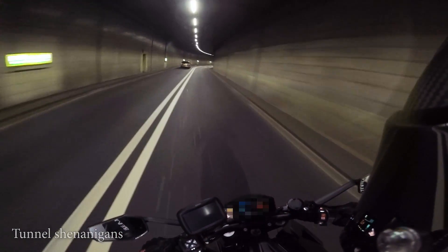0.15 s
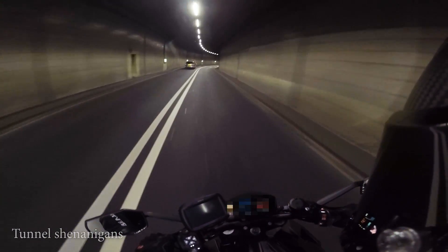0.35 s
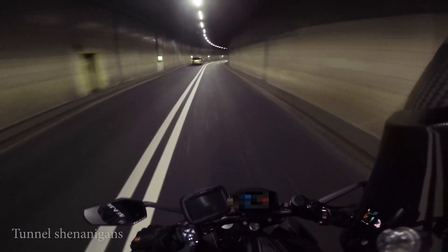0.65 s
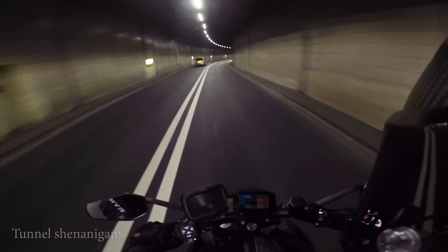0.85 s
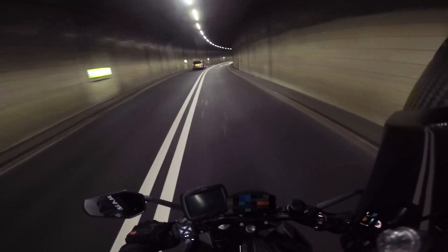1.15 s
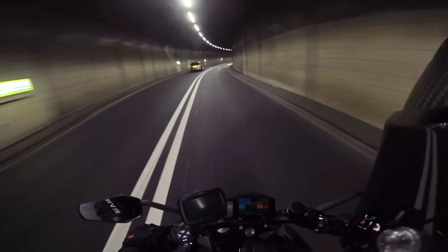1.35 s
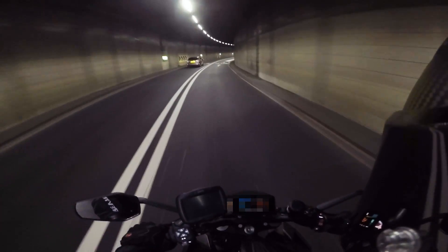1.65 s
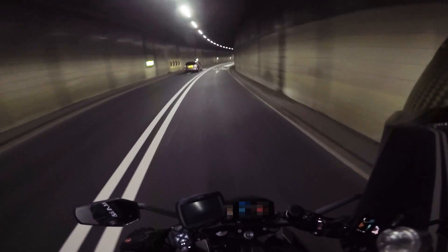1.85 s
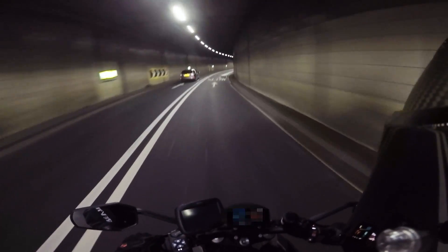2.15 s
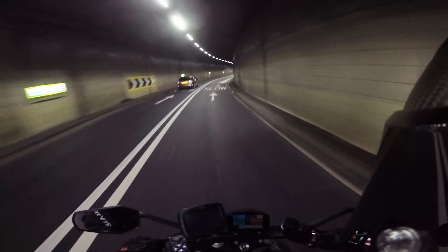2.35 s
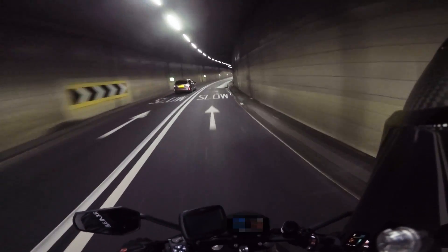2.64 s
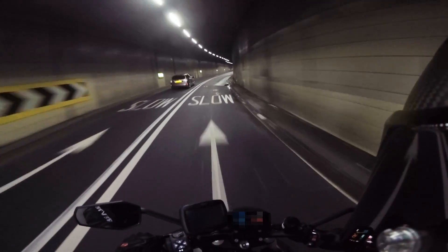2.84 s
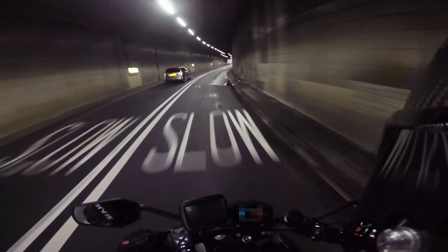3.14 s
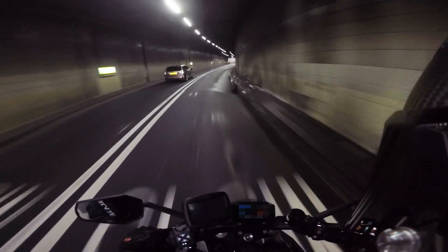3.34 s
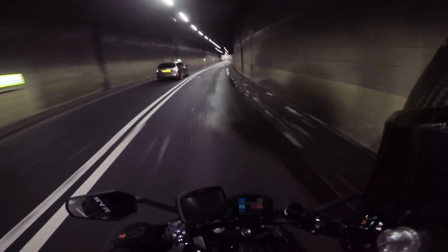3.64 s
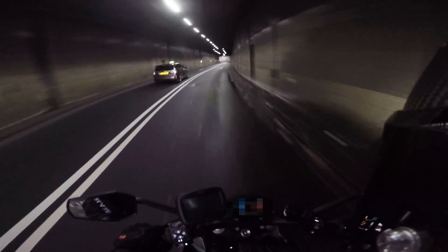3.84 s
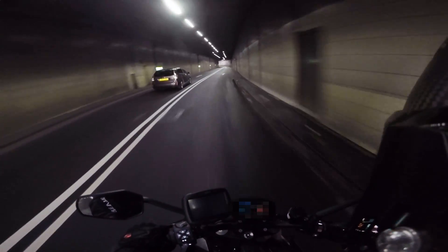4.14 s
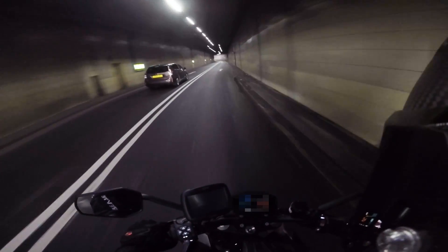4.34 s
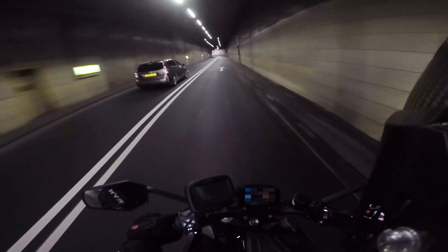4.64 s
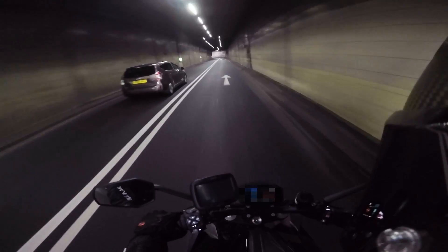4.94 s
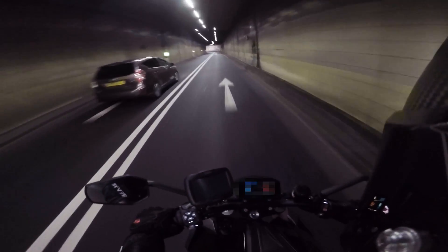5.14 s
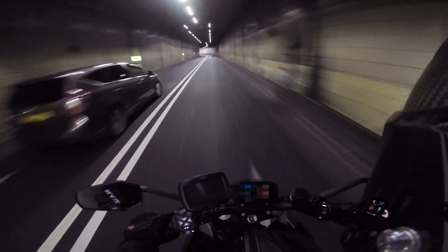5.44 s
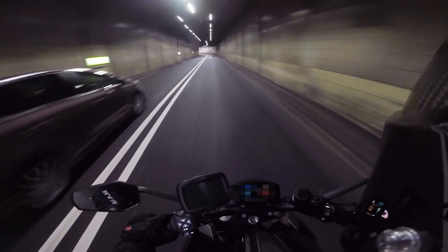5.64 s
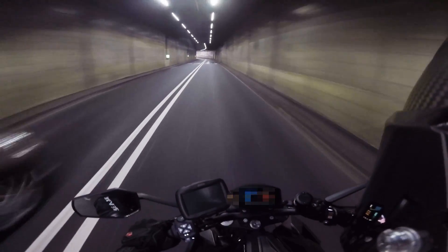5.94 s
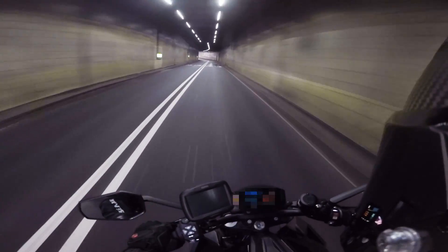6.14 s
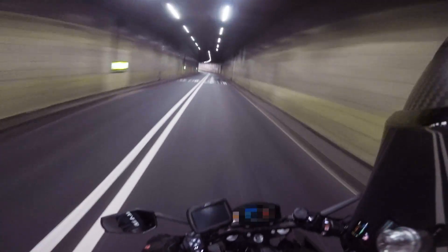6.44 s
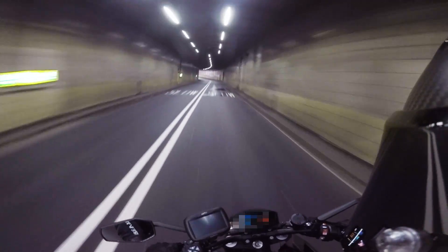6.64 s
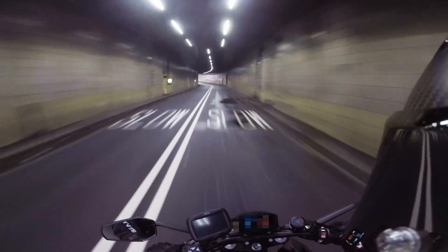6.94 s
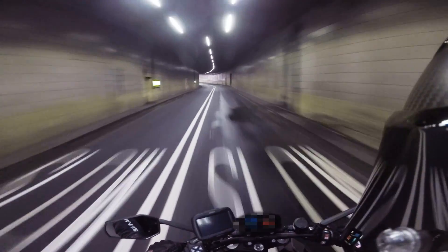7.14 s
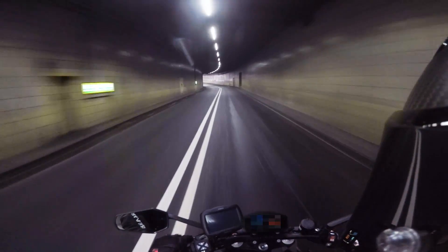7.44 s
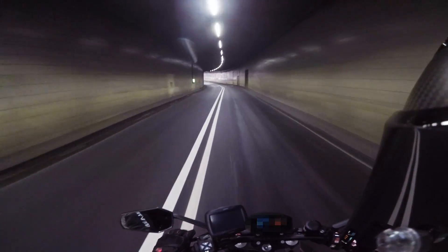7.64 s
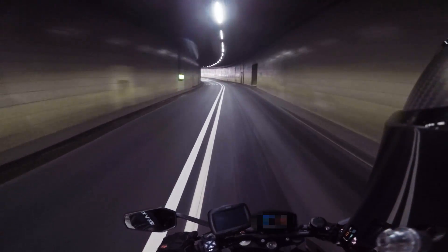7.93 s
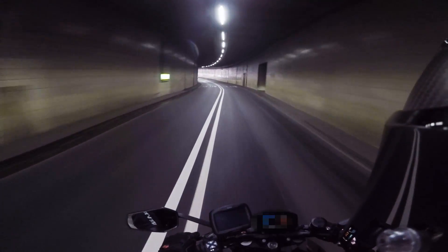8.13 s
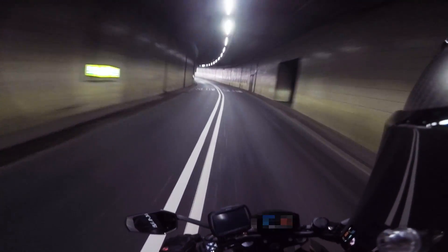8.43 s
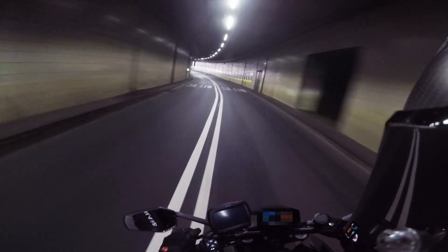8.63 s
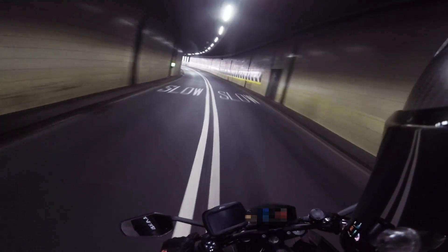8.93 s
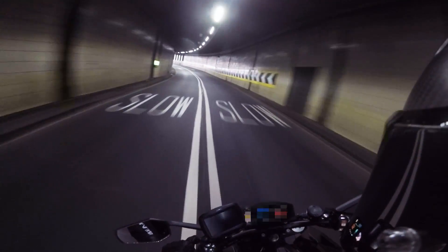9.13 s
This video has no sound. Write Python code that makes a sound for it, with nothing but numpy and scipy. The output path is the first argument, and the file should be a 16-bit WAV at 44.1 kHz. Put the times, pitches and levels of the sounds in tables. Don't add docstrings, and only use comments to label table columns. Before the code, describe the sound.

Onboard a two-cylinder motorcycle in a road tunnel, with low wind thumps, patchy air and tyre hiss and a long, dark echo throughout. From 0 to 1.2 s the engine cruises at a low, lumpy, uneven throb. It eases off, and dull pops and thuds scatter between 1.4 and 1.8 s, with a few more to 2.8 s as the pitch sags slightly. Around 3.2 s light throttle returns with a rougher beat; from 4.3 s it pulls hard, barking and rasping with pulsing intake roar, one pop near 5.2 s, climbing to its highest pitch at 6.2 s. The throttle snaps shut: the roar drops to a hollow, boomy overrun, slowly falling in pitch under heavy gusts around 6.2 to 6.9 s. At 9.07 to 9.26 s a rapid volley of bright afterfire cracks bursts out, the loudest near 9.18 s clipping the microphone and ringing through the tunnel.

```python
import sys
import numpy as np
from scipy import signal
from scipy.fft import rfft, irfft, next_fast_len
from scipy.io import wavfile
from scipy.ndimage import uniform_filter1d, map_coordinates

SR = 44100
rng = np.random.default_rng(int(sys.argv[2]) if len(sys.argv) > 2 else 0)


def unload_audio(sound):
    columns = np.transpose(np.atleast_2d(sound))
    steps = np.round(np.clip(columns, -1, 1) * 32767)
    wavfile.write(sys.argv[1], SR, steps.astype(np.int16))


def boost_factor(decibels):
    exponent = np.asarray(decibels, float) / 20
    return 10 ** exponent


N = 409248

SECOND = 0.385
SHUT_S = 6.19


def unit(x):
    return x / np.sqrt(np.mean(x ** 2) + 1e-20)


def steady(x):
    return x / np.sqrt(np.abs(uniform_filter1d(x ** 2, size=SR // 8)) + 1e-9)


def along(points, hz):
    f, v = np.transpose(points)
    return np.interp(np.log(hz + 1), np.log(f + 1), v)


def curves(rows):
    s, *cols = np.transpose(rows)
    return [np.interp(np.arange(N) / SR, s, c) for c in cols]


def wobble(rate):
    coarse = np.arange(0, N + 128, 128)
    knots = rng.standard_normal(int(N * rate / SR) + 4)
    return np.interp(np.arange(N), coarse, map_coordinates(knots, [coarse * rate / SR]))


def filtered(x, response):
    m = next_fast_len(N + 8192)
    return irfft(rfft(x, m) * response(np.fft.rfftfreq(m, 1 / SR)), m)[..., :N]


def resonance(f, hz, width):
    return 1j * f * width / (hz * hz - f * f + 1j * f * width)


def spikes(s, size):
    at = np.round(s * SR).astype(int)
    keep = (at >= 0) & (at < N)
    return np.bincount(at[keep], size[keep], N)


def controls():
    # (time [s], speed [cycles per s])
    speeds = [(0.0, 32.93), (0.51, 33.91), (1.06, 35.86), (1.39, 34.65), (1.43, 35.03), (2.8, 32.12),
              (3.25, 31.1), (3.47, 31.84), (3.66, 30.83), (4.43, 33.19), (5.18, 38.68), (6.19, 49.6),
              (6.2, 43.56), (6.31, 47.39), (7.4, 42.26), (7.91, 39.19), (8.81, 36.17), (9.28, 35.31)]
    # (time [s], throttle [0-1], boom level [dB], lean mixture [0-1])
    effort = [(0, 0.3, -15, 0.14), (.6, 0.25, -14, 0.02), (1.12, 0.22, -15.5, 0.25),
              (1.25, 0.09, -17.5, 0.08), (1.9, 0.06, -14.5, 0), (2.5, 0.08, -17.5, 0.07),
              (3.13, 0.17, -22, 0.02), (3.2, 0.23, -22, 0.92), (3.6, 0.27, -17, 1),
              (3.9, 0.29, -16.5, 0.24), (4.25, 0.46, -14, 0.26), (4.62, 0.93, -13, 0.12),
              (5.4, 0.93, -13.5, 0.5), (6.11, 0.72, -9.5, 0.6), (6.19, 0.07, -12, 0.09),
              (8, 0.01, -10.5, 0.03), (9.2, 0.03, -14, 0.17), (9.28, 0.06, -16, 0.4)]
    first_cycle, base_speed, full_song_hz = -0.352, 34, 13
    (speed,), (throttle, boom_db, lean) = curves(speeds), curves(effort)
    cycle, faster = first_cycle + np.cumsum(speed) / SR, speed - base_speed
    load = np.clip(throttle / 0.3, 0, 1)
    hard = np.clip((throttle - 0.3) / 0.7, 0, 1)
    song = hard * np.clip(faster / full_song_hz, 0, 1)
    shut = uniform_filter1d(1.0 * (np.arange(N) / SR > SHUT_S), size=SR // 20)
    return cycle, faster, load, hard, song, boom_db, np.clip(lean, 0, 1), shut


def buffeting():
    # (frequency [Hz], level [dB])
    spectrum = [(10, -120), (20, 4.5), (35, 4), (50, 7), (75, 4.5), (120, -2.5), (250, -4.5), (500, -120)]
    # (time [s], swell [dB])
    gusts = [(.75, 3.5), (1.2, 7), (1.63, 4), (2.101, 1), (2.65, 5), (3.779, 3), (4.2, -10), (4.549, -7),
             (5.85, 3.5), (6.15, 7), (6.282, 5.5), (6.401, 9), (6.58, 8), (6.85, 6), (7.32, 3), (7.6, 3.5),
             (7.82, 3), (8.15, 4), (9.2, 8.5)]
    gust_s = 0.11
    t = np.arange(0, N, 32) / SR
    swell_db = sum(db * np.exp(-((t - s) / gust_s) ** 2) for s, db in gusts).repeat(32)[:N]
    rumble = unit(filtered(rng.standard_normal(N), lambda f: boost_factor(along(spectrum, f))))
    lumpy = unit(boost_factor(2.4 * wobble(14)) * rumble)
    return boost_factor(-26 + 0.5 * wobble(6) + swell_db) * lumpy


def hiss():
    # (frequency [Hz], density [dB per Hz])
    spectrum = [(650, -11), (1100, 5), (1990, -2.5), (2440, -5), (3860, -9), (5100, -8.5), (7810, -12),
                (13100, -24.5), (15300, -26), (16000, -59)]
    cycle, faster, _, hard, *_ = controls()
    since = np.minimum(cycle % 1, (cycle - SECOND) % 1)
    hiss_db = -40 + 0.6973 * faster + hard * (5 + 0.16 * np.minimum(faster, 17))
    chuff_db = hard * 14.5 * (0.4 - np.minimum(since / 0.78, 1))
    z = signal.stft(rng.standard_normal(N), nperseg=512)[2]
    patches = uniform_filter1d(rng.standard_normal(z.shape), size=6, axis=0)
    patches = unit(uniform_filter1d(patches, size=8, axis=1))
    air = signal.istft(z * boost_factor(1.33 * patches), nperseg=512)[1][:N]
    air = unit(filtered(air, lambda f: boost_factor(along(spectrum, f))))
    return boost_factor(hiss_db + chuff_db + 0.17 * wobble(30)) * air


def tunnel(x):
    # (frequency [Hz], decay time t60 [s])
    decay = [(100, 8.2), (600, 5.2), (3000, 2.7), (10000, 0.071)]
    hz, t, z = signal.stft(rng.standard_normal(SR), SR, nperseg=256)
    tail = signal.istft(z * boost_factor(-60 * t / along(decay, hz)[:, None]), SR, nperseg=256)[1]
    return signal.fftconvolve(np.pad(x, (400, 0)), tail / np.linalg.norm(tail))[:N]


def walls(x):
    t60, first_s = 0.24, 0.014
    t = np.arange(SR // 3) / SR
    dull = signal.lfilter([1], [1, -0.8], rng.standard_normal(len(t)))
    tail = dull * boost_factor(-60 * t / t60) * (t > first_s)
    return signal.oaconvolve(x, tail / np.linalg.norm(tail))[:N]


def pipe(f):
    # (frequency [Hz], width [Hz], level [dB])
    modes = [(330, 370, -0.5), (578, 208, 5.5), (760, 147, 2), (1000, 180, -5.5)]
    ringing = sum((-1) ** k * boost_factor(db) * resonance(f, hz, width) for k, (hz, width, db) in enumerate(modes))
    silencer = 1 / (1 - (f / 1150) ** 2 + 1.2j * f / 1150)
    open_end = (1j * f / (330 + 1j * f)) ** 2
    return ringing * silencer * open_end


def cracked(train, noisy, t60):
    # (frequency [Hz], level [dB])
    shock = [(300, -120), (600, -74), (1050, 6), (1600, 7), (2400, 4), (3500, -2.5), (5200, -2.5),
             (8000, -12.5), (12000, -19.5), (16300, -48)]
    t = np.arange(SR // 50) / SR
    burst = signal.fftconvolve(np.abs(train), boost_factor(-60 * t / t60))[:N] * rng.standard_normal(N)
    front = train + 0.15 * np.roll(train, round(0.0011 * SR))
    return filtered(noisy * burst - front, lambda f: boost_factor(along(shock, f)))


def pops():
    # (time [s], peak level [dB], thud level [dB])
    afterfire = [(1.3935, -22, 3), (1.4501, -22, 6), (1.5624, -21, -2), (1.62, -30, -1), (1.6511, -39, -5),
                 (1.694, -13, 0.5), (1.708, -32, -15), (1.737, -31, -4), (1.7948, -24, -11),
                 (1.9707, -33, -7), (2.3308, -32, -2), (2.5593, -23, 5), (2.6332, -32, -11),
                 (2.839, -17, 5.5), (5.2398, -14, 3), (6.352, -33, 2), (9.0714, -26, -12),
                 (9.1002, -43, -12), (9.128, -31, -10), (9.1436, -7, 1), (9.156, -17, 0),
                 (9.1838, 3.5, -21), (9.212, -18, -4), (9.2285, -24, 7), (9.243, -28, -5), (9.259, -37, -5)]
    s, db, thud_db = np.transpose(afterfire)
    thud = filtered(spikes(s, boost_factor(db + thud_db + 39)), pipe)
    shock = cracked(spikes(s + 0.0012, boost_factor(0.89 * db + 19)), noisy=0.07, t60=0.005)
    cool = np.arange(N) / SR < SHUT_S
    dull = filtered(cool * shock, lambda f: 1.55 / (1 + 1j * f / 1900) ** 2)
    bright = filtered(~cool * shock, lambda f: 0.79 / (1 + 1j * f / 4000))
    return -thud - dull - bright


def firings(cycle, first, second, scatter_db, jitter):
    whole, t = np.arange(-1, cycle[-1] + 1), np.arange(N) / SR
    chance = rng.standard_normal((2, 2, len(whole)))
    trains = []
    for share, (off, size) in zip((first, second), chance):
        s = np.interp(whole, cycle - share, t, left=-1, right=-1)
        trains.append(spikes(s + jitter * off, boost_factor(scatter_db * size)))
    return trains


def blasts(ride):
    cycle, faster, load, hard, song, _, lean, shut = ride
    round_trip = 0.0066
    one, two = firings(cycle, 0, SECOND, scatter_db=0.8, jitter=0.00004)
    front = load * (one + boost_factor(2) * two)
    behind = 0.0075 * load * (1 - hard ** 3) * (1 - lean) + 0.024 * song
    one, two = firings(cycle, 0, SECOND + behind, scatter_db=0.8, jitter=0.00004)
    early = load * (1 - 0.83 * lean) * (one + boost_factor(1.5 - 4.4 * hard) * two)
    trail = (1 - load) * (1 - shut)
    first = 0.045 * trail - 0.06 * lean - 0.02 * shut * np.clip(5 - faster / 2, 0, 1)
    second = SECOND + behind - 0.02 * trail + 0.025 * shut
    one, two = firings(cycle, first, second, scatter_db=1.1, jitter=0.00007)
    one = boost_factor(5.2 * lean) * one
    two = boost_factor(14 - 10 * load - shut * (10 - 0.12 * faster) - 11.6 * lean) * two
    late, rasp = np.roll([one + two, (1 - 0.26 * shut) * one + two], round(round_trip * SR), axis=1)
    return front, early, late, rasp


def exhaust_bark(ride, early, late):
    _, faster, load, hard, song, _, _, shut = ride
    again_s, again_db = 0.00502, -17.5
    again = boost_factor(again_db - 0.5 * shut * faster) * (1 - hard) * np.roll(late, round(again_s * SR))
    waves = early + (0.9 - 0.29 * load - 0.79 * hard) * (again - late)
    bark = filtered(np.roll(waves, -round(0.001833 * SR)), pipe)
    fast_gas = hard * early - 0.5 * (1 - load) * np.clip(faster / 6, 0, 1) * late
    bark = bark - filtered(fast_gas, lambda f: resonance(f, hz=815, width=850) ** 2)
    chamber = filtered(bark, lambda f: resonance(f, hz=540, width=130))
    return steady(bark - 0.57 * np.maximum(hard - song, 0) * chamber)


def exhaust_crack(hard, front, rasp):
    crack = cracked((0.1 + 3.5 * hard) * front, noisy=0.22, t60=0.008)
    return steady(crack + cracked(-0.14 * rasp, noisy=0.61, t60=0.01))


def boom(ride, orders):
    # (order [per cycle], level [dB])
    cruising = [(1, -14), (2, -5), (3, -25.5), (4, -11), (5, 2), (6, -7.5), (7, -18), (8, -10), (9, -18),
                (10, -9), (11, -15.5), (12, -8), (13, -14.5), (14, -16)]
    pulling = [(1, -15), (2, -10), (3, -3), (4, -0.5), (5, -7), (6, -8.5), (7, -6), (8, -2.5), (9, -5),
               (10, 5), (11, 3), (12, -10), (13, 1), (14, -41)]
    coasting = [(1, -14), (2, -19), (3, 0.5), (4, 1.5), (5, -6), (6, -8.5), (7, -13.5), (8, -9), (9, -3.5),
                (10, -10.5), (11, -31), (12, -17), (13, -53), (14, -33)]
    closed = [(1, -14), (2, -19), (3, -8), (4, 0.5), (5, -10.5), (6, -20.5), (7, -10.5), (8, -19), (9, -13),
              (10, -16), (11, -27), (12, -24), (13, -19.5), (14, -11)]
    cycle, faster, load, hard, song, _, _, shut = ride
    total = np.zeros(N)
    lag = 0.32 - 0.305 * load
    for k in orders:
        drift = wobble(7)
        cruise_db, pull_db, coast_db = cruising[k - 1][1], pulling[k - 1][1], coasting[k - 1][1]
        coast_db = coast_db + shut * (closed[k - 1][1] - coast_db)
        if k == 5:
            coast_db = coast_db + 0.61 * np.maximum(faster - 1.7, 0)
        db = coast_db + load * (cruise_db - coast_db) + song * (pull_db - cruise_db) + 0.8 * drift
        second = 0.87 + 0.8 * load[::64]
        pair = np.angle(1 + second * np.exp(-2j * np.pi * k * SECOND)).repeat(64)[:N]
        start = 7.9 - 3.2 * load - 1.5 * hard - 0.33 * faster * (1 - load)
        start = start + 1.1 * (load - song) * (k in (4, 6, 8))
        phase = 2 * np.pi * k * (cycle - lag) + pair + start + 0.2 * np.flip(drift)
        total += boost_factor(db) * np.sin(phase)
    return steady(total)


def frame_shake(cycle, faster, load):
    shake_db = -24.5 - 1.5 * faster * (1 - 1.05 * load) + 2.5 * wobble(6.9)
    return boost_factor(shake_db) * np.cos(2 * np.pi * 2 * cycle + 0.58 * wobble(4.5))


def engine():
    ride = controls()
    cycle, faster, load, hard, _, boom_db, lean, _ = ride
    cruise = load * np.clip(1 - 4 * hard, 0, 1) * np.clip(faster - 0.4, 0, 3)
    bark_db = -10 + 0.71 * boom_db - 0.69 * lean + hard * (6.5 - 0.39 * faster)
    crack_db = -37.5 + 0.5 * faster + 0.22 * (boom_db + 15) - 5 * load
    crack_db = crack_db + (11.5 + 0.96 * faster) * hard + 1.47 * cruise
    growl_db = bark_db - 2 * cruise - 2.5 - 13.4 * (0.5 - load)
    growl_db = growl_db - (6.5 - 0.44 * faster) * hard + 0.49 * (1 - load) * (faster + 0.5)
    front, early, late, rasp = blasts(ride)
    bark = boost_factor(bark_db - 3.5) * exhaust_bark(ride, early, late)
    crack = boost_factor(crack_db) * exhaust_crack(hard, front, rasp)
    low = boost_factor(boom_db - 0.7) * boom(ride, orders=range(3, 9))
    growl = boost_factor(growl_db) * boom(ride, orders=range(9, 15))
    return low + growl + frame_shake(cycle, faster, load), bark + crack


def scene():
    low, blast = engine()
    bangs = pops()
    blast = blast + bangs
    echo = tunnel(boost_factor(-13) * blast + boost_factor(-17) * low)
    wind = buffeting() + hiss()
    mono = low + blast + echo + boost_factor(-23) * walls(bangs) + wind
    return np.array([mono, mono])


def top_cut(x):
    return signal.sosfilt(signal.butter(12, 16260, fs=SR, output="sos"), x)


def record(dry):
    late = lambda f: np.exp(-2j * np.pi * f * 442 / SR)
    low_cut = lambda f: (1j * f / (170 + 1j * f)) * (1j * f / (45 + 1j * f))
    high_cut = lambda f: 1 / (1 + 1j * f / 8000) / (1 + (f / 15000) ** 4)
    dry = dry / (1 + np.abs(dry / 1.05) ** 6) ** (1 / 6)
    side = boost_factor(-2.5) * filtered(dry[0], lambda f: late(f) * low_cut(f) * high_cut(f))
    wide = np.array([dry[0] + side, dry[1] - side])
    wide = wide / (1 + np.abs(wide / 1.04) ** 6) ** (1 / 6)
    return top_cut(wide)


dry = scene()
out = record(dry)
unload_audio(out)
```